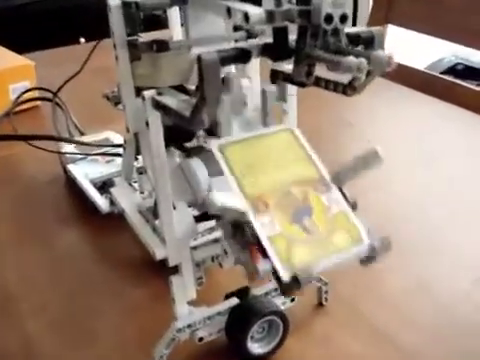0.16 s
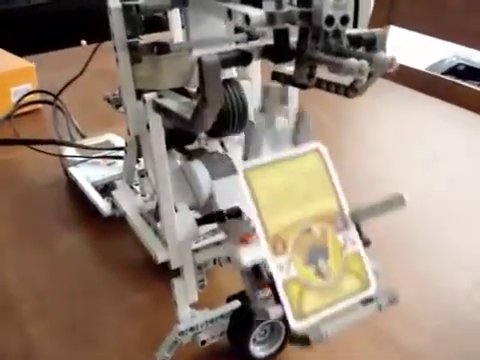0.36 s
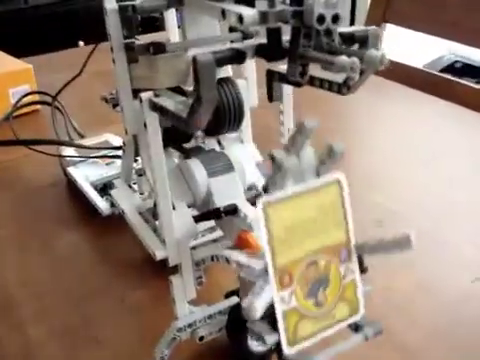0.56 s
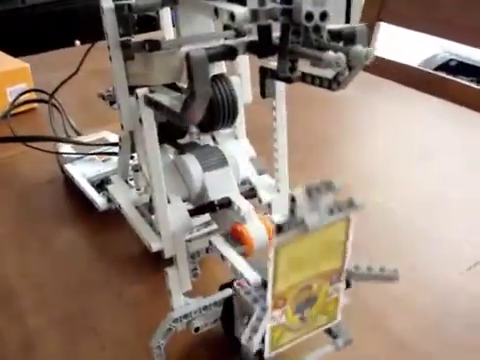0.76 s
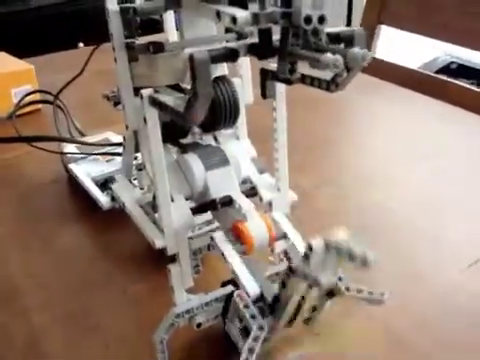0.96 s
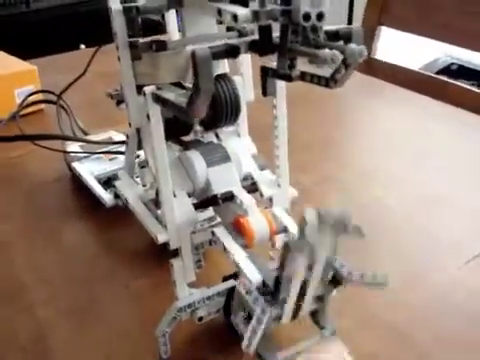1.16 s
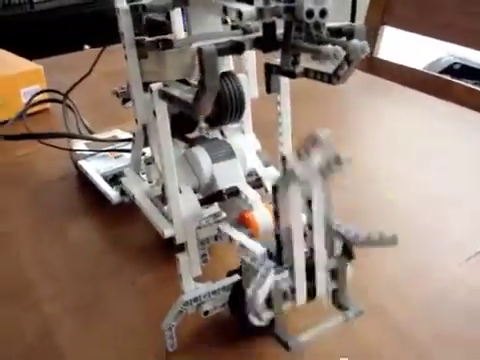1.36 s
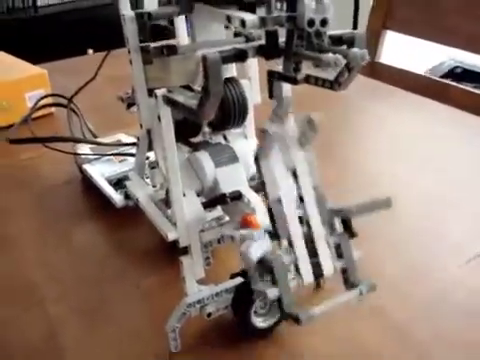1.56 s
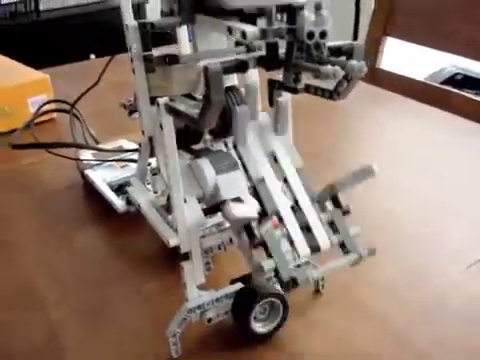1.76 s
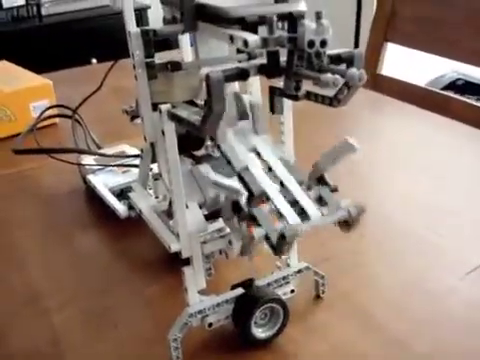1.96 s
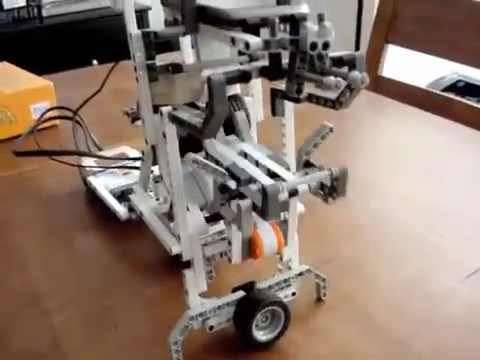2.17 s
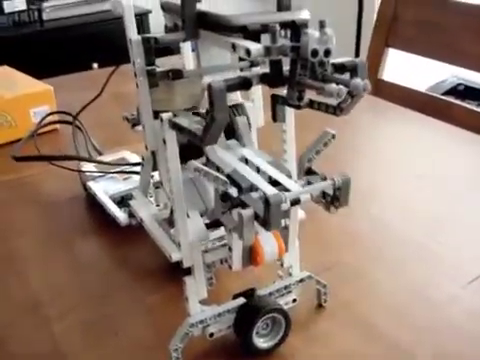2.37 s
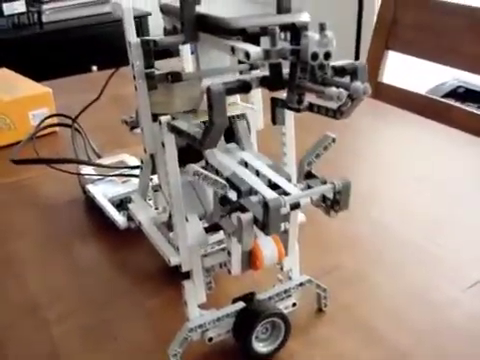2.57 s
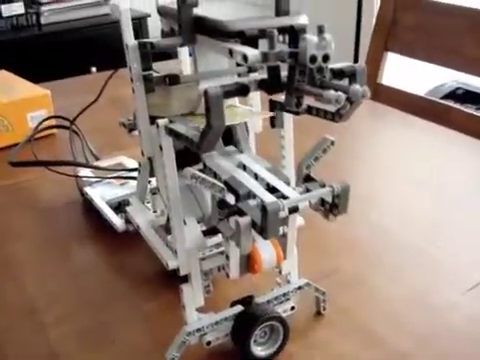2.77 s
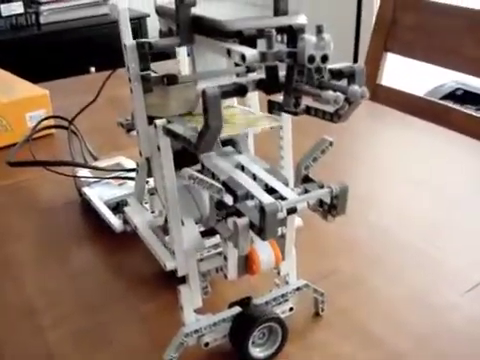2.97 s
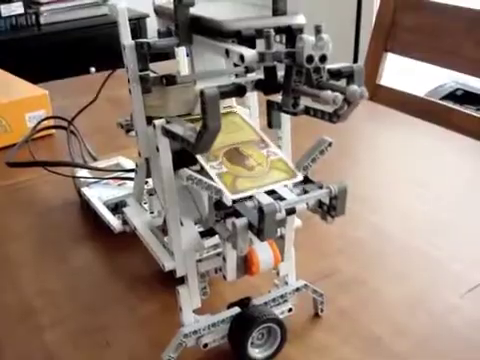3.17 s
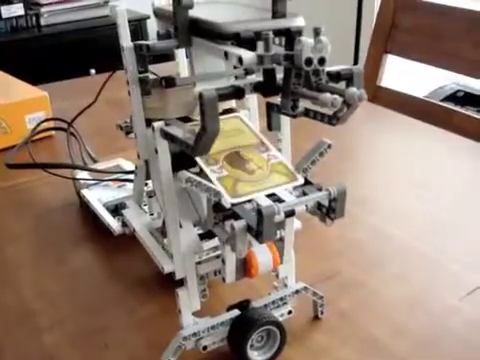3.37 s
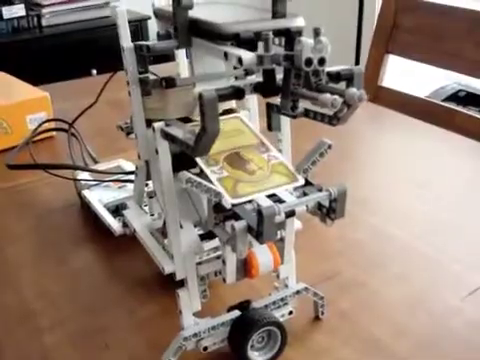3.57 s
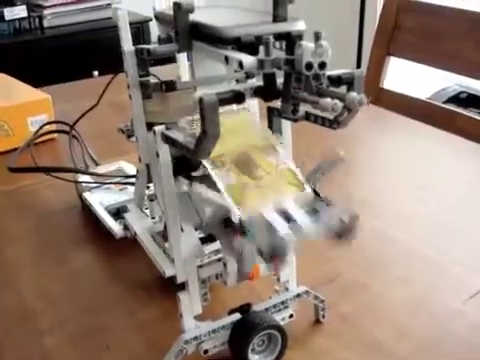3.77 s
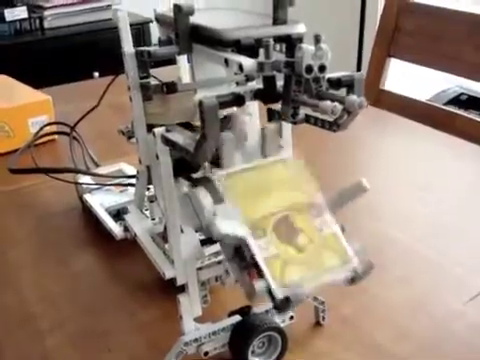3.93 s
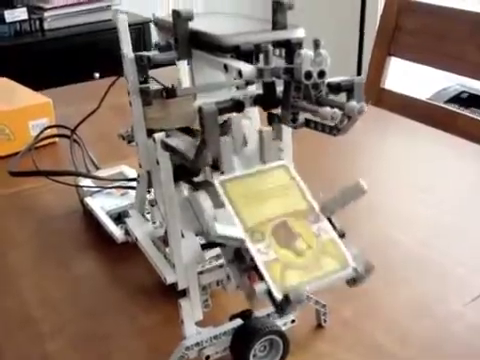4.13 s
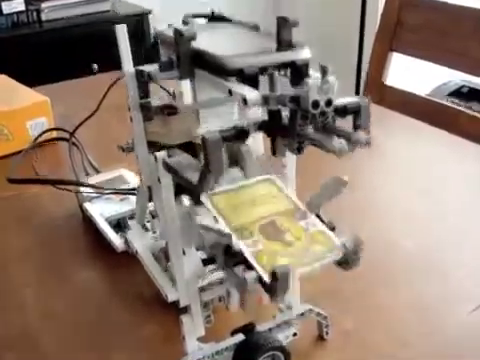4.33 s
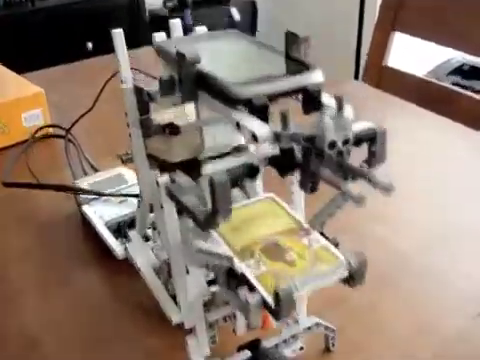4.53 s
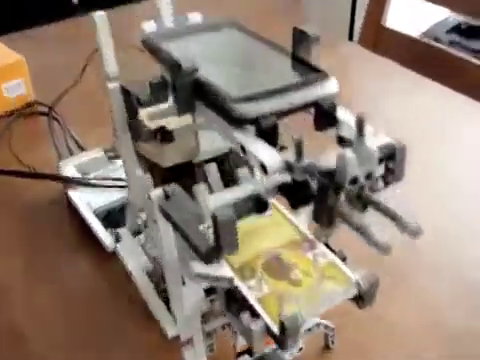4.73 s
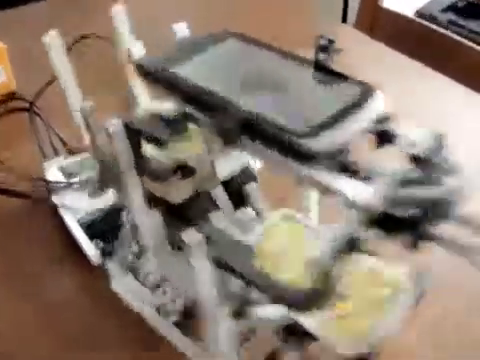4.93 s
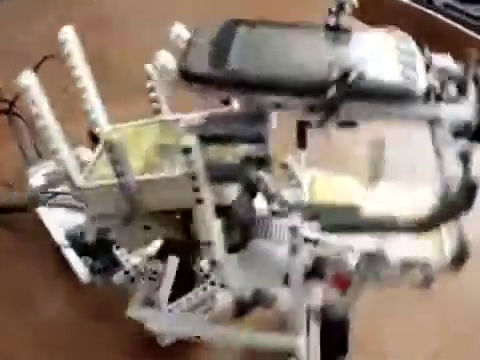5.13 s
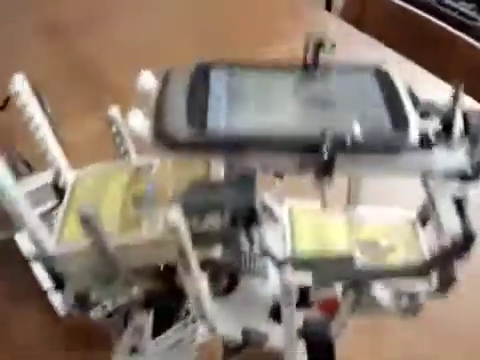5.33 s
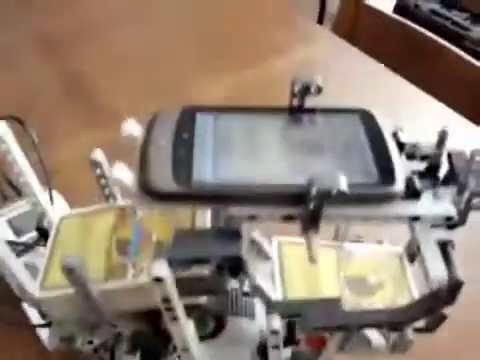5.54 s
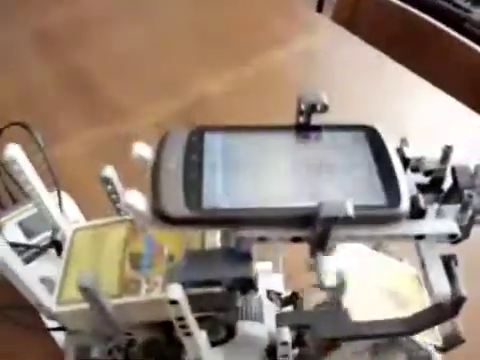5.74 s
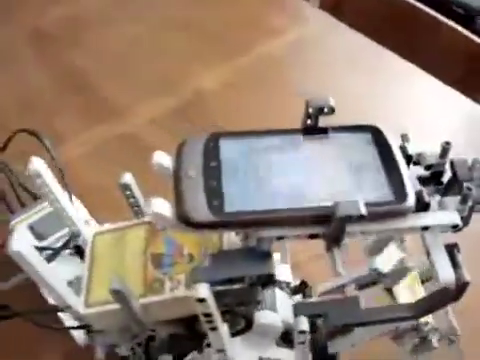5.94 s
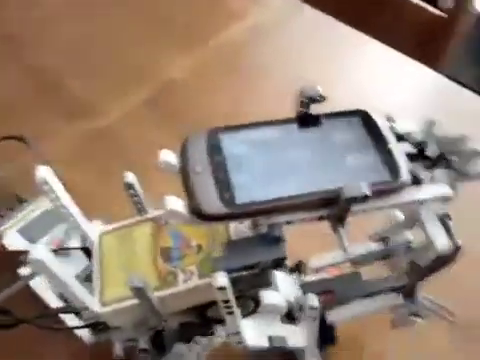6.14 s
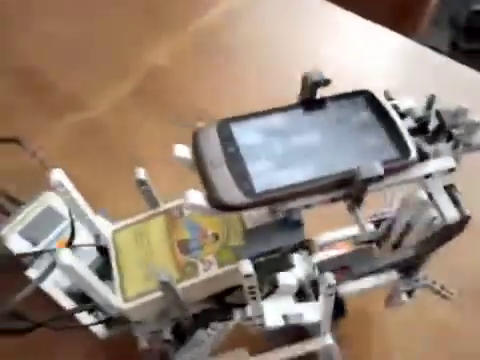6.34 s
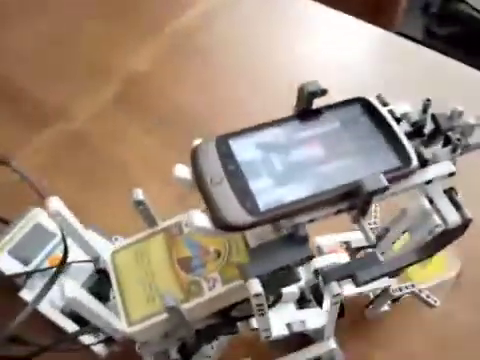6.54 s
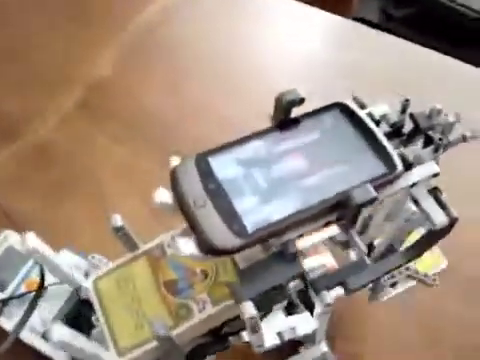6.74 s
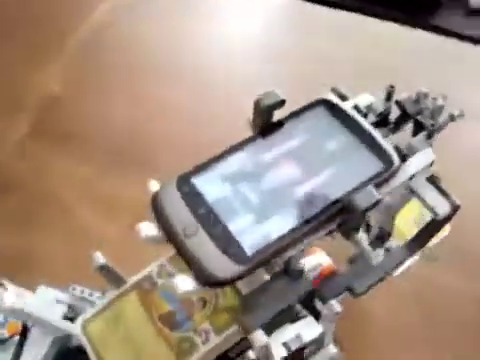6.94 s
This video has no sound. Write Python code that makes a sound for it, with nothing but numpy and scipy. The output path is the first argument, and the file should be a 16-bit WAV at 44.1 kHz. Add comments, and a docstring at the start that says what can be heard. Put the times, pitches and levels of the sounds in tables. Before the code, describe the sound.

Close handheld microphone, small lightly reverberant room. Loose gears chatter and plastic joints snap between short motor runs: a low purring tray stroke down and back, a fast raspy whine as a wheel feeds a card, a quick reversal, then clattering and a brief low gear growl as the robot turns. A final duller tray purr with soft rustling ends in a loud clack and a papery puff as the card lands. Faint hum and air noise continue throughout.

```python
"""A faint hum in a quiet room comes first; then loose gears rattle and a plastic-brick robot deals playing cards.
Geared servos tip the card tray, spin the feed wheel forth and back, and turn the robot on a wooden table.
Gear sound is a train of tooth impacts and scrapes, filtered by the resonances of the housing.
Rattles and clacks are irregular contacts that set plastic beams ringing; the card rubs and puffs air.
Decaying random reflections form the room, under steady air noise and thin whistles."""
import sys
import numpy as np
from scipy import signal
from scipy.fft import rfft, irfft
from scipy.io import wavfile

SR = 44100
rng = np.random.default_rng(int(sys.argv[2]) if len(sys.argv) > 2 else 0)


def digitize_waveform(pressure):
    """Quantize a signal to 16-bit integers and store it at the path in sys.argv[1].

    Rows of a 2-D input are taken as channels; values are limited to [-1, 1].
    """
    field = np.atleast_2d(pressure).T
    bounded = np.clip(field, -1, 1)
    quanta = np.round(bounded * 32767).astype(np.int16)
    wavfile.write(sys.argv[1], SR, quanta)


N = 308700
TIME = np.arange(N) / SR  # seconds

# Background air spectrum: frequency_hz, relative_level_db
AIR_SPECTRUM = [(15, -62.5), (25, -39), (65, -16.5), (107, -15), (134, -13), (239, -6), (277, -5.5),
                (348, -5.5), (414, -5.5), (519, -6.5), (667, -6), (924, -8.5), (1100, -9), (2010, -12),
                (10000, -23.5), (13000, -80), (22000, -120)]
# Level of the wavering hum: time_s, level_db
HUM_LEVEL = [(0.0, -78), (0.27, -69), (0.51, -74), (1.79, -66), (2.79, -77), (2.84, -68), (3.84, -63),
             (4.33, -79), (5.01, -64), (5.21, -71), (6.67, -65), (7.0, -70)]
# Thin electronic whistles: pitch_hz, first_level_db, last_level_db
WHISTLES = [(7620, -76, -76), (8230, -80, -70)]
# Reverberation time of the room: frequency_hz, decay_by_60_db_s
ROOM_T60 = [(200, 0.45), (1500, 0.52), (5000, .35), (10000, 0.18)]
# Soft rustle during the third tray stroke: peak_s, level_db, rise_s, fall_s
RUSTLE = (6.1, -51.5, .24, .22)
# Spectrum of the rustle: frequency_hz, relative_level_db
RUSTLE_SPECTRUM = [(150, -15), (400, -4), (1100, 2), (2300, -2.5), (3500, -3), (10000, -17)]
# Heavy blows that reach the base or the table: start_s, level_db, boom_hz
THUMPS = [(1.209, -41, 340), (3.181, -44.5, 70), (5.308, -45, 300), (6.714, -45.5, 75)]
# The card settles on the table: peak_s, level_db, rise_s, fall_s
CARD_FLOP = (6.87, -48, .022, .035)
# Puff of air under the card: frequency_hz, relative_level_db
CARD_AIR = [(90, -31), (200, -5), (450, -6), (800, -10), (1500, -20)]
# Plastic parts knocking: start_s, level_db, chatter_s, tilt_db_per_octave, beam_pitch_hz, rebound_db
CLACKS = [(.268, -33, .0034, -4, 3120, -14), (.365, -37.5, .0026, -2, 3270, -15),
          (.383, -39, .0023, -3, 3060, -15), (1.2063, -28.7, .0055, -1.2, 1150, 2.5),
          (2.268, -36.5, .0012, 0, 3200, -6), (2.2978, -34.5, .005, 1.5, 3200, 2),
          (3.1766, -28.5, .007, -2, 2900, -1.5), (3.241, -34, .002, 3, 4200, -15),
          (3.284, -37.5, .0026, -1, 3000, -10), (3.310, -28.5, .0012, -2.5, 2900, -10),
          (3.336, -30, .003, -3, 2270, -18), (3.955, -37.5, .0046, -1, 3200, -12),
          (4.0433, -28.5, .0076, -2, 2310, -6), (4.0954, -23.5, .0011, -2.2, 2850, -18),
          (4.573, -36, .006, 0, 2950, 5), (4.971, -35.5, .005, -1.5, 3036, -15),
          (5.003, -37.5, .0064, -2.5, 3100, -15), (5.3072, -24.7, .0074, -1.7, 1671, -10),
          (5.66, -41.5, .0045, 0, 5130, -12), (6.716, -23.7, .007, 1, 2440, -.5)]
# Spectrum of struck plastic: frequency_hz, relative_level_db
CLACK_BODY = [(120, -44.5), (200, -16.5), (350, -9), (700, -4), (1150, -1), (1600, -1), (2400, 1.5),
              (2800, 3), (3900, 3.5), (5900, 0), (6800, -0.5), (7600, -5.5), (9200, -5), (10000, -12),
              (13000, -49)]
# Gears rattling through their slack: peak_s, level_db, rise_s, fall_s, tilt_db_per_octave, ring_hz, ring_db
RATTLES = [(.174, -42.5, .017, .02, .5, 4780, 12), (.203, -44.5, .04, .06, -1, 3020, 10),
           (.28, -40.5, .012, .03, 2, 5000, -2), (1.304, -39.7, .022, .046, -1.3, 2300, 0),
           (2.312, -39.5, .012, .014, .5, 5300, 8), (2.457, -29.5, .008, .015, .5, 3000, 15),
           (3.33, -46, .05, .05, -1, 3000, 0), (3.76, -46, .03, .025, 1, 4600, 6),
           (3.87, -39.5, .018, .049, -1, 3220, 3), (3.976, -37.5, .016, .019, -.5, 3150, 0),
           (4.413, -40, .042, .034, -1.2, 4700, 5), (4.49, -50, .027, .056, -1, 3100, 5),
           (5.34, -49, .015, .1, -6.5, 1400, 5), (5.692, -40, .022, .045, 1.5, 3550, -1),
           (5.814, -42, .033, .023, .3, 2650, -2), (6.79, -42, .04, .09, -2.3, 2400, 0)]
# Spectrum of the rattling gear train: frequency_hz, relative_level_db
RATTLE_BODY = [(350, -44.5), (600, -15), (1120, -12.5), (1450, -7.5), (1730, -6.5), (2270, -3.5),
               (2460, -7.5), (3230, -1.5), (3680, -4), (5050, -4.5), (7810, -9.5), (9210, -13.5),
               (10000, -26.5), (13000, -55), (22000, -120)]
# Housing resonances above that spectrum: centre_hz, width_hz, height_db
RATTLE_MODES = [(2200, 110, 1.5), (3280, 630, 2.4), (3990, 330, 3), (4970, 500, 3)]
# Run of the turning motor: up_to_speed_s, cut_s, level_db, spin_up_s, coast_s
TURN_RUN = (5.11, 5.2, -41, .14, .075)
# Spectrum of the turning gearbox: frequency_hz, relative_level_db
TURN_BODY = [(260, -59), (450, -20), (519, -15), (828, -9.5), (943, -14.5), (1450, -2.5), (2280, -4),
             (2590, -7), (2950, -3.5), (3630, -12.5), (5030, -15.5), (5950, -16), (7040, -23),
             (10000, -30.5), (13000, -65), (22000, -120)]
# Its housing resonances: centre_hz, width_hz, height_db
TURN_MODES = [(1350, 73, 2.7), (1830, 356, 4.5), (2287, 130, 4.6), (6050, 680, 3.2)]
# Runs of the feed motor, forth and back: up_to_speed_s, cut_s, level_db, spin_up_s, coast_s
PUSH_RUN = (2.413, 3.19, -39.5, .02, .062)
BACK_RUN = (3.39, 3.655, -37.8, .012, .068)
# Feed gear speed as the load of the card comes and goes: time_s, teeth_per_s
PUSH_SPEED = [(2.37, 270), (2.42, 400), (2.48, 325), (2.58, 436), (2.65, 410), (2.79, 400), (2.86, 430),
              (2.97, 425), (3.17, 385), (3.29, 238)]
BACK_SPEED = [(3.36, 240), (3.44, 367), (3.5, 347), (3.57, 406), (3.66, 410), (3.82, 180)]
# Spectra of the feed gearbox, forth and back: frequency_hz, relative_level_db
FEED_BODY = [(240, -55), (400, -22), (733, -23.5), (1190, -10), (1740, -16.5), (2100, -6.5), (2670, -7.5),
             (2980, -3), (3500, -7), (4060, -2.5), (5170, -10), (5990, -9.5), (10000, -16.5), (13000, -56),
             (22000, -120)]
BACK_BODY = [(240, -55), (400, -40), (1030, -21.5), (1600, -11.5), (1880, -15.5), (2120, -9), (2370, -13),
             (3690, -12.5), (4520, -4), (5170, -9), (6080, -8.5), (6770, -16), (10000, -21.5), (13000, -67),
             (22000, -120)]
# Their housing resonances: centre_hz, width_hz, height_db
FEED_MODES = [(1160, 300, 2), (1570, 200, 2), (2040, 220, 3.8), (2850, 270, 3.7), (4150, 460, 3.2),
              (5970, 560, 4.5)]
BACK_MODES = [(1660, 170, 4), (2170, 180, 3), (2960, 600, 8), (4560, 370, 4.3), (6040, 780, 4.1)]
# Clean whine of the feed gears: multiple_of_tooth_rate, level_db
MESH_TONES = [(3, -19), (4, -19), (5, -19), (7, -19)]
# The feed wheel grips and rasps: peak_s, level_db, pitch_hz
GRIPS = [(2.422, -33, 4230), (2.597, -38, 4270), (2.738, -39, 4150), (2.812, -38, 4140), (2.903, -37, 4000),
         (2.998, -40, 4060), (3.135, -43, 4100), (3.452, -33, 4460), (3.6, -38, 4550), (3.655, -41, 4600)]
# Spectrum of the rubber rasp: frequency_hz, relative_level_db
RASP_SPECTRUM = [(1000, -29.5), (3000, -2), (4400, 8.5), (6200, -14.5), (10000, -31)]
# Strokes of the tray servo: start_s, stop_s, level_db
STROKES = [(.366, 1.112, -48.7), (1.438, 2.185, -49.4), (5.84, 6.63, -51.3), (6.87, 7.1, -52.5)]
# Spectra of the tray gearbox, from the side and from above: frequency_hz, relative_level_db
TRAY_BODY = [(290, -24), (500, -23), (1260, -17), (1400, 1.5), (1770, -7), (2250, 2.5), (2490, -8.5),
             (3320, -5), (5020, -5.5), (10000, -24.5), (13000, -63), (22000, -120)]
TRAY_ABOVE = [(210, -29), (350, -4), (414, -5), (457, -7), (548, -16), (649, -9), (1730, 1), (1940, -6),
              (2110, 0), (3850, -6), (4750, -1), (9060, -12.5), (10000, -21), (13000, -63), (22000, -120)]
# Housing resonances of the tray, from the side: centre_hz, width_hz, height_db
TRAY_MODES = [(1450, 200, -3.5), (2320, 190, 2.5), (3230, 160, 8), (4090, 320, 8), (5010, 580, 7),
              (7500, 960, 5.5)]

AIR_DB = -53.5
HUM_HZ, HUM_OCTAVE_DB = 146.5, -17  # mean pitch; lower octave relative to the hum
BOOM_RISE_S = .0015
REBOUND_S = .0047  # delay of the second contact
TURN_TEETH_HZ, TURN_CRAWL = 197, .45  # top tooth rate, and the share of it at which the gears start
SURGE_DB, SURGE_S = 5.5, .09  # the feed motor strains as it first drags the card
GRIP_S, GRIP_LOAD_DB = .018, 2.2  # rise and fall of a rasp; gain of the loaded motor
TRAY_TEETH_HZ = 133.5  # the tooth rate that the servo holds
OVERSHOOT_HZ, SETTLE_S, HUNT_HZ = 13, .13, 3.6  # hunting of the servo as it sets off
LAST_PUSH_HZ, LAST_PUSH_S = 9, .07  # extra speed just before it stops
TRAY_DB_PER_HZ = .22  # faster is louder
TRAY_RISE_S, TRAY_FALL_S, TRAY_WAVER_DB = .012, .024, .9
ABOVE_FROM_S = 5  # from here on the tray is heard from above
EDGE_HZ = 10200  # upper edge of the sound's band


def amp(db):
    """Logarithmic level: decibels become an amplitude gain."""
    return 10 ** (np.asarray(db) / 20)


def unit(x):
    """Normalization: the signal is scaled to rms 1."""
    return x / np.sqrt(np.mean(x ** 2) + 1e-20)


def curve(rows):
    """Linear interpolation: a control curve at every sample."""
    return np.interp(TIME, *np.transpose(rows))


def read(points, hz):
    """Logarithmic pitch scale: a spectrum is interpolated over log frequency."""
    f, value = np.transpose(points)
    return np.interp(np.log(hz + 1), np.log(f + 1), value)


def drift(hz):
    """Low-pass noise: slow random change of rms 1, up to about the given rate."""
    lowpass = np.exp(-(np.fft.rfftfreq(N, 1 / SR) / hz) ** 2)
    return unit(irfft(rfft(rng.standard_normal(N)) * lowpass, N))


def body(colour, modes=(), tilt_db=0, size=2048):
    """Minimum-phase resonance: a causal response of energy 1, a broad spectrum with modes on top."""
    hz = np.fft.rfftfreq(size, 1 / SR)
    db = read(colour, hz) + tilt_db * np.log2(np.maximum(hz, 300) / 300)
    for centre, width, height in modes:
        db = db + height / (1 + (2 * (hz - centre) / width) ** 2)
    log_gain = np.log(amp(np.maximum(db, db.max() - 80)))
    mirrored = np.r_[log_gain, log_gain[-2:0:-1]]
    # the Hilbert transform of log gain is the minimum phase
    ring = np.fft.ifft(np.exp(signal.hilbert(mirrored).conj())).real
    early, late = np.sum(ring[:size // 2] ** 2), np.sum(ring[size // 2:] ** 2)
    ring = ring if early > late else ring[::-1]
    return ring / np.linalg.norm(ring)


def through(x, ring):
    """Linear filtering: a signal is convolved with an impulse response."""
    return signal.oaconvolve(x, ring)[:len(x)]


def add(mix, s, sound):
    """Superposition: a sound is summed into the mix at a given time."""
    part = mix[round(s * SR):][:len(sound)]
    part += sound[:len(part)]


def running(start, stop, rise, fall):
    """Inertia of a motor: it spins up, holds and coasts down, from 0 to 1."""
    return np.exp(-(np.maximum(start - TIME, 0) / rise + np.maximum(TIME - stop, 0) / fall) ** 1.75)


def drive(start, stop, db, rise, fall):
    """Motor loudness: the gain follows the spin-up and coasting of one run."""
    return amp(db) * running(start, stop, rise, fall)


def swell(s, db, rise, fall):
    """Growth and decay: a level builds up to one peak and dies away."""
    return amp(db) * running(s, s, rise, fall)


def contacts(size, spread_db):
    """Friction as dense tiny impacts of uneven strength."""
    return unit(rng.standard_normal(size) * amp(spread_db * np.clip(rng.standard_normal(size), -2, 2)))


def teeth(rate, jitter, uneven_db, scrape, scrape_s, frame_s, order=600):
    """Gear meshing: each tooth snaps in, shakes the frame in the same way and scrapes for a moment."""
    turns = np.cumsum(rate * (1 + jitter * drift(90))) / SR
    strength = amp(uneven_db * np.clip(rng.standard_normal(N), -2, 1))
    snaps = np.diff(np.floor(turns), prepend=0) * strength / np.sqrt(rate)
    t = TIME[:order]
    onset = 1 - np.exp(-t / 0.00054)  # the shake takes a moment to spread
    frame = rng.standard_normal(order) * onset * np.exp(-t / frame_s)
    spectrum = rfft(frame, 2 * order)
    # flatten the random spectrum halfway, so that the body filter sets the colour
    frame = irfft(spectrum / np.sqrt(abs(spectrum) + 1e-9))[:order]
    rubbing = through(snaps, onset * np.exp(-t / scrape_s)) * contacts(N, 0.51)
    share = np.clip(scrape, 0, 1)
    return np.sqrt(1 - share) * unit(through(snaps, frame)) + np.sqrt(share) * unit(rubbing)


def background():
    """Stationary noise and tones: room air, a wavering hum with its lower octave, thin whistles."""
    air_noise = rng.standard_normal(N) * amp(.5 * drift(5.4))
    air = amp(AIR_DB) * through(air_noise, body(AIR_SPECTRUM, size=8192))
    phase = 2 * np.pi * np.cumsum(HUM_HZ * (1 + .004 * drift(8.8))) / SR
    octaves = np.sin(phase) + amp(HUM_OCTAVE_DB) * np.sin(phase / 2)
    hum = amp(curve(HUM_LEVEL)) * np.sqrt(2) * octaves
    whistles = np.zeros(N)
    for hz, first, last in WHISTLES:
        level = amp(np.linspace(first, last, N) + 2 * drift(4))
        whistles += level * np.sin(2 * np.pi * np.cumsum(hz + 25 * drift(110)) / SR)
    return air + hum + whistles


def room(x, size=22050):
    """Reverberation: sparse reflections from table and walls decay, the treble soonest."""
    taps = rng.standard_normal(size) * (rng.random(size) < .1) * (TIME[:size] > .004)
    hz, t, z = signal.stft(taps, SR, nperseg=256)
    decay = amp(-60 * t / read(ROOM_T60, hz)[:, None])
    tail = signal.istft(z * decay, SR, nperseg=256)[1]
    return through(x, tail / np.linalg.norm(tail))


def rustle():
    """Light friction: soft, grainy rubbing that swells and fades."""
    return through(contacts(N, 2.5) * swell(*RUSTLE), body(RUSTLE_SPECTRUM))


def thumps(size=1300, cycles=1.2, longest_s=.006):
    """Heavily damped oscillation: the base and table top give a short, dull boom."""
    out, t = np.zeros(N), TIME[:size]
    for s, db, hz in THUMPS:
        shape = (1 - np.exp(-t / BOOM_RISE_S)) * np.exp(-t / min(cycles / hz, longest_s))
        add(out, s, amp(db) * 2 * np.sin(2 * np.pi * hz * t) * shape)
    return out


def card():
    """Friction and displaced air: the card slides onto the tray, later falls flat with a soft puff."""
    rubbing = contacts(N, 3.6) * swell(3.6, -46, 0.045, 0.036)
    slide = through(rubbing, body(CLACK_BODY, tilt_db=-2.8))
    return slide + through(rng.standard_normal(N) * swell(*CARD_FLOP), body(CARD_AIR))


def clacks(size=8000, shake_db=-16, shake_s=0.028, overtone=1.875, long_chatter=0.015):
    """Impact and rebound: joints chatter, the frame shakes out and the struck beam rings in two modes."""
    out, t = np.zeros(N), TIME[:size]
    for s, db, chatter, tilt, hz, rebound_db in CLACKS:
        shake = amp(shake_db) * np.exp(-t / shake_s) * np.sqrt(chatter / long_chatter)
        joints = np.exp(-t / chatter) + shake
        ring_db = 9 * (1 - np.exp(-chatter / 0.00067))  # longer contact stirs the beam more
        modes = [(hz, 230, ring_db), (hz * overtone, 300, 0.66 * ring_db)]
        beam = body(CLACK_BODY, modes, tilt)
        for at, level in (s, db), (s + REBOUND_S, db + rebound_db):
            blow = contacts(size, 1.1) * joints
            blow[0] += 2.5  # the hard first contact
            add(out, at, amp(level) * through(blow, beam))
    return out


def rattles():
    """Backlash: a motor jerks and the loose gear train chatters, each time with another beam ringing."""
    gears = teeth(np.full(N, 290.), jitter=.3, uneven_db=3.5, scrape=0.63, scrape_s=0.0032, frame_s=0.00087)
    out = np.zeros(N)
    for s, db, rise, fall, tilt, hz, ring_db in RATTLES:
        beam = body(RATTLE_BODY, [*RATTLE_MODES, (hz, 380, ring_db)], tilt)
        out += through(gears * swell(s, db, rise, fall), beam)
    return out


def wheels():
    """Gear mesh under inertia: the robot turns with a growl whose speed and level rise and fall together."""
    start, stop, db, rise, fall = TURN_RUN
    effort = running(start, stop, rise, fall)
    speed = TURN_TEETH_HZ * (TURN_CRAWL + (1 - TURN_CRAWL) * effort)
    gears = teeth(speed, jitter=.04, uneven_db=2, scrape=.6, scrape_s=.0028, frame_s=.002)
    return through(gears * amp(db) * effort, body(TURN_BODY, TURN_MODES, tilt_db=.3))


def rasps(gears):
    """Grip friction: the rubber wheel rasps, driven by the gear vibration, near one pitch per grip."""
    out = np.zeros(N)
    for s, db, hz in GRIPS:
        out += through(gears * swell(s, db, GRIP_S, GRIP_S), body(RASP_SPECTRUM, [(hz, 600, 12)]))
    return out


def feeder():
    """Gear mesh under load: a fast, harsh whir as the wheel pushes a card out, then backs off."""
    speed = curve(PUSH_SPEED + BACK_SPEED)
    gears = teeth(speed, jitter=.03, uneven_db=2.5, scrape=.6, scrape_s=.0009, frame_s=.0008)
    gears = gears * amp(0.99 * drift(60))
    turns = np.cumsum(speed * (1 + .016 * drift(50))) / SR
    whine = np.zeros(N)
    for order, db in MESH_TONES:
        whine += amp(db + 3 * drift(15)) * np.sin(2 * np.pi * order * turns)
    grip = sum(running(s, s, 2 * GRIP_S, 2 * GRIP_S) for s, _, _ in GRIPS)
    load = amp(GRIP_LOAD_DB * grip)
    surge = amp(SURGE_DB * np.exp(-((TIME - PUSH_RUN[0]) / SURGE_S) ** 2))
    push = drive(*PUSH_RUN) * load * surge
    forth = through(gears * push, body(FEED_BODY, FEED_MODES, tilt_db=0.27)) + whine * push
    back = through(gears * load * drive(*BACK_RUN), body(BACK_BODY, BACK_MODES, tilt_db=-.1))
    return forth + back + rasps(gears)


def tray():
    """Slow gear mesh: single teeth are heard in each stroke, more blurred in the late ones from above."""
    excess, level = np.zeros(N), np.zeros(N)
    for start, stop, db in STROKES:
        on = running(start, stop, TRAY_RISE_S, TRAY_FALL_S)
        age = np.maximum(TIME - start, 0)
        hunting = OVERSHOOT_HZ * np.exp(-age / SETTLE_S) * np.cos(2 * np.pi * HUNT_HZ * age)
        last_push = LAST_PUSH_HZ * np.exp(-abs(stop - TIME) / LAST_PUSH_S)
        excess += on * (hunting + last_push)
        level += on * amp(db)
    speed = TRAY_TEETH_HZ + excess
    level = level * amp(TRAY_DB_PER_HZ * excess + TRAY_WAVER_DB * drift(14))
    crisp = teeth(speed, jitter=.015, uneven_db=1.6, scrape=.5, scrape_s=.0022, frame_s=.0016)
    blurred = teeth(speed, jitter=.015, uneven_db=1.5, scrape=.5, scrape_s=.0026, frame_s=.0018)
    side = body(TRAY_BODY, TRAY_MODES, tilt_db=.5)
    above = body(TRAY_ABOVE, [(2150, 200, 6.5), (3160, 250, 4.1), (4700, 270, 4)], tilt_db=1.0)
    early = through(crisp * level * (TIME < ABOVE_FROM_S), side)
    late = through(blurred * level * (TIME >= ABOVE_FROM_S), above)
    return early + late


def scene():
    """Direct and reflected sound: the robot close by, its room, and the background."""
    strokes = tray()
    whirs = feeder() + wheels() + rattles()
    knocks = clacks() + card()
    reflections = room(amp(-9) * strokes + amp(-8) * whirs + amp(-9) * knocks)
    return (strokes + whirs + knocks + thumps() + rustle() + reflections + background())[None]


def record(dry):
    """Low-pass filtering: nothing is heard above about 10 kHz."""
    lowpass = signal.firwin(401, EDGE_HZ, window=("kaiser", 7), fs=SR)
    return signal.oaconvolve(dry, lowpass[None], "same")


dry = scene()
out = record(dry)
digitize_waveform(out)
```